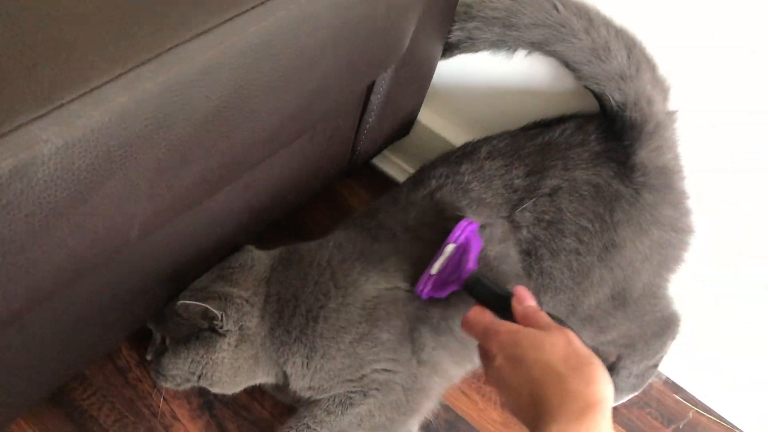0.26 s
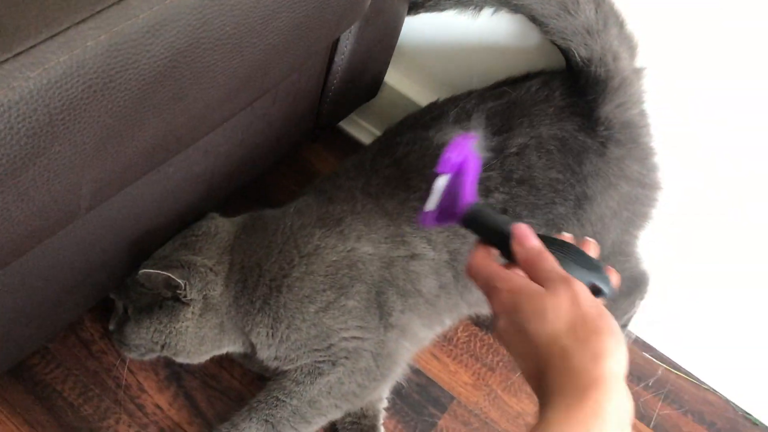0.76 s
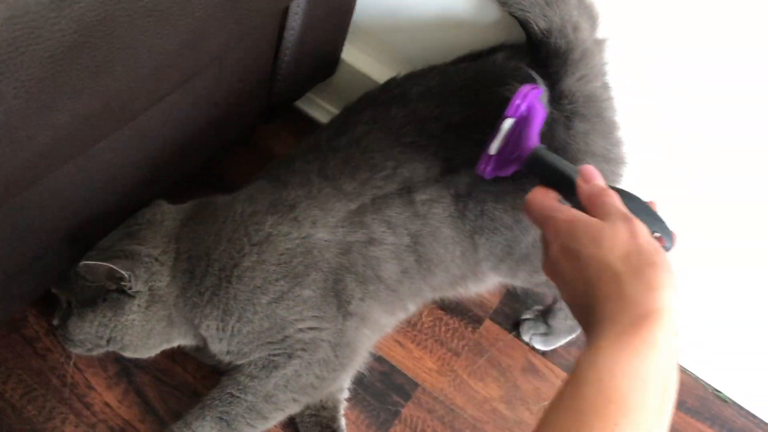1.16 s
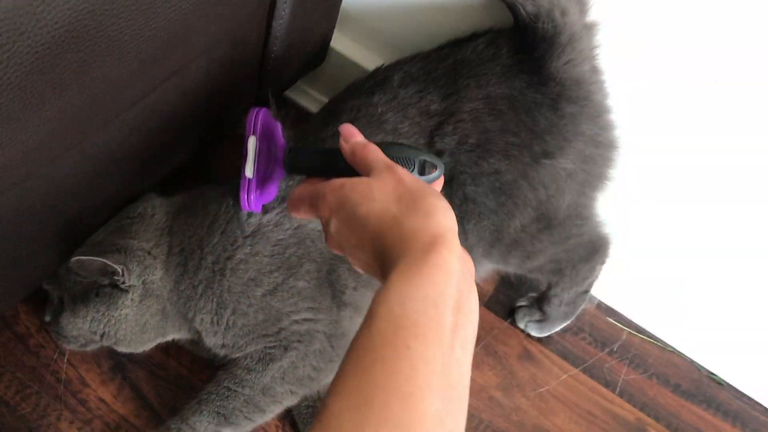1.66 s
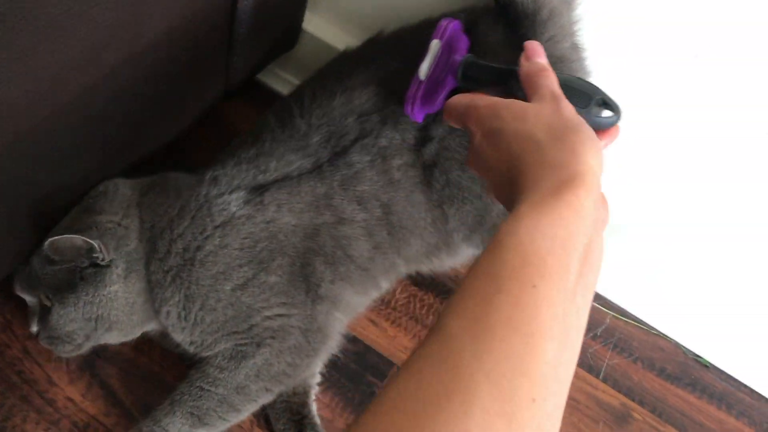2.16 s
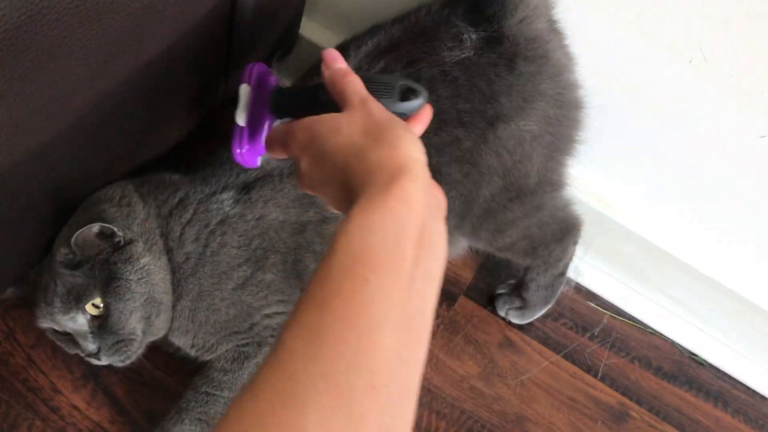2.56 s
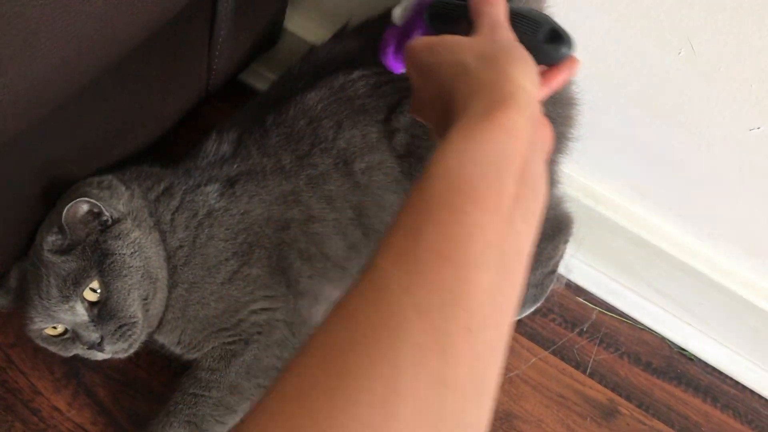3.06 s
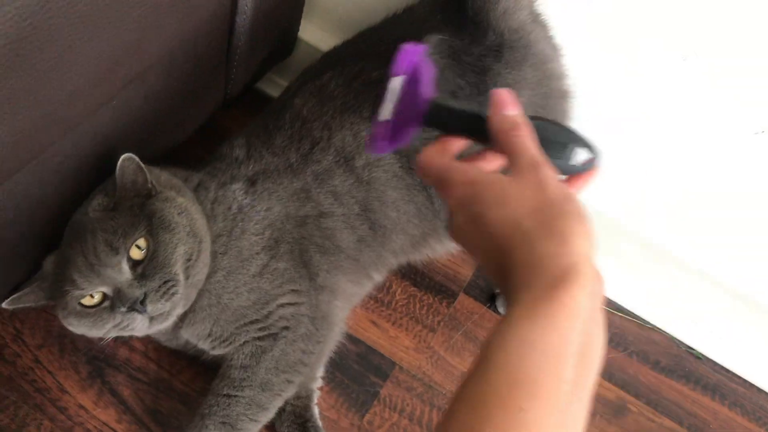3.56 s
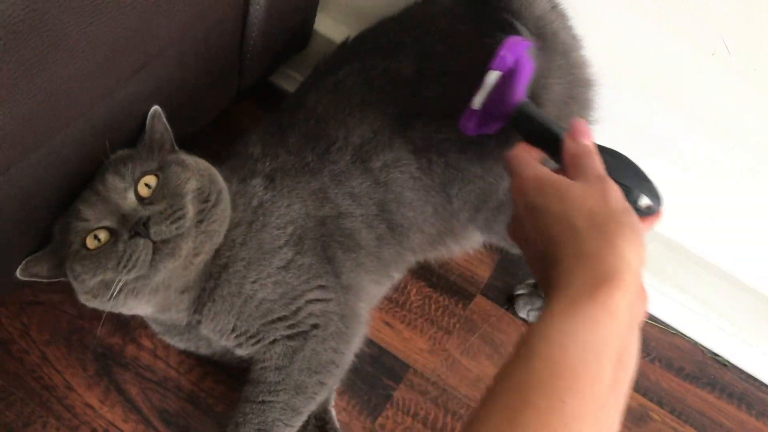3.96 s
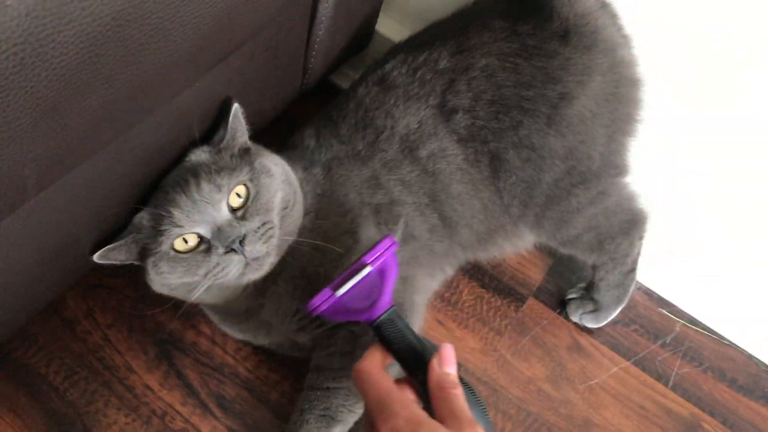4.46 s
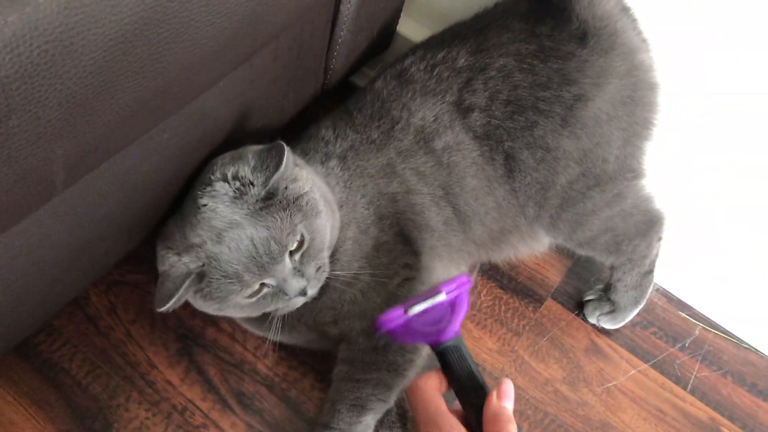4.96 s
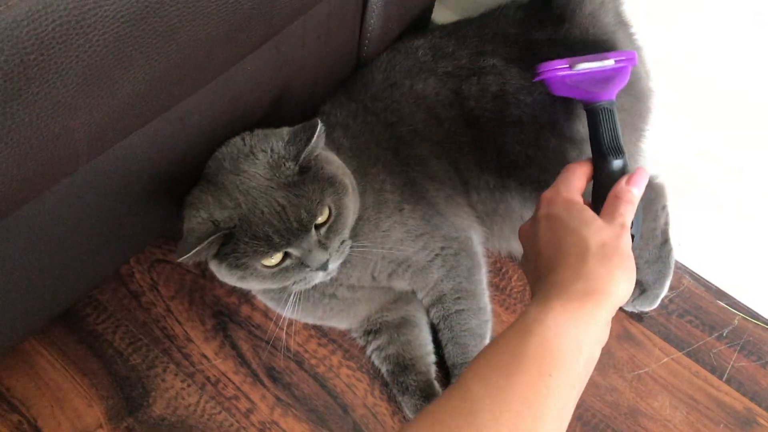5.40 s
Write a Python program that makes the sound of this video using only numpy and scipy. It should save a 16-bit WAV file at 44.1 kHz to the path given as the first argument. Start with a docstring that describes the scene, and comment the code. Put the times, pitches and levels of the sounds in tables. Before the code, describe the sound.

A steady low appliance hum and faint hiss lie under the close sound of a cat being combed. Quick scratchy pulls come singly and in pairs, then three run together near three seconds, each airy and slightly ringing. Coarser rasps catch in the thick fur. The cat purrs in low fluttering bouts through the second half, with muffled arm rustle, dull bumps and small plastic clicks before a last stroke.

```python
"""Combing a purring cat, close microphone

A steel-toothed grooming tool is raked through the coat of a softly purring cat in a quiet room.
Up close, hairs slip off the teeth with a fine hiss that sets the blade ringing; the teeth rasp where they
bite in, the plastic head ticks, and the arm rustles and bumps. The purr is a train of snaps and air puffs
ringing the chest. Behind it an appliance motor hums as a set of sine lines, over room rumble and hiss."""
import sys
import numpy as np
from scipy import signal
from scipy.fft import rfft, irfft
from scipy.io import wavfile

SR = 44100
rng = np.random.default_rng(int(sys.argv[2]) if len(sys.argv) > 2 else 0)


def bounce(signal):
    """Save signal as a 16-bit WAV file at the path given by the first command-line argument."""
    frames = np.transpose(np.atleast_2d(signal))
    limited = np.clip(frames, -1, 1)
    pcm = np.round(limited * 32767).astype(np.int16)
    wavfile.write(sys.argv[1], SR, pcm)


N = 248408
TIME = np.arange(N) / SR  # seconds

# Pulls through the coat, with a gliding lowest resonance of the comb; ring levels are relative to the pull:
# start_s, end_s, start_level_db, end_level_db, lowest_start_hz, lowest_end_hz, lowest_width_hz,
# lowest_db, second_db, third_db, highest_db
STROKES = [(0.169, 0.448, -68.5, -64.5, 3760, 3470, 550, -11.5, -11, -17, -11),
           (0.476, 0.585, -64, -64, 4380, 4110, 650, -1.5, -18, -11, -8),
           (0.958, 1.07, -72, -63.5, 3600, 3500, 600, -9.5, -9, -14, -12),
           (1.096, 1.257, -68.5, -63, 4000, 3840, 1000, -5, -18, -16, -6),
           (1.807, 2.1, -70, -63, 4230, 3970, 550, -13, -18, -11, -7),
           (2.079, 2.284, -60.5, -61.5, 4110, 3620, 500, -7.5, -10.5, -11, -6),
           (2.781, 2.957, -67.5, -63.5, 4200, 4060, 700, -18, -16, -17, -6),
           (2.943, 3.119, -62, -60.5, 3620, 3500, 250, -11, -18, -2.5, -9),
           (3.101, 3.322, -60.5, -60, 4030, 4200, 327, -6.5, -15, -7.5, -5),
           (3.849, 4.034, -63, -60, 4000, 4000, 806, -8.5, -19, -10, -8),
           (4.729, 4.795, -63, -63.5, 4120, 4100, 130, -10, -10, -11, -17),
           (4.802, 4.935, -65, -69, 4030, 4040, 110, -3, -17, -20, -10),
           (5.484, 5.66, -63, -61, 4080, 4060, 131, -7.5, -20, -10, -19)]
# The comb skims the coat between pulls: peak_s, rise_s, fall_s, level_db
SKIMS = [(0.84, .04, .05, -66.5), (2.44, 0.15, 0.11, -67), (3.48, 0.14, 0.44, -66.5), (4.1, .06, 0.13, -68),
         (5.49, .07, 0.046, -68.5)]
# Hiss of the sliding hairs: pitch_hz, density_db (per Hz)
FUR_SPECTRUM = [(600, -7.5), (1300, -2.5), (2600, -0.5), (3600, 1), (4900, -1.5), (6000, -2), (7500, -2),
                (8800, -1), (10400, -6), (12500, -2.5), (15500, -4.5)]
# Ringing of the comb: pitch_hz, width_hz, level_db
BLADE_MODES = [(3500, 430, -1), (4130, 280, -3), (8450, 300, 2), (13300, 280, 3.5), (15500, 400, -4)]
# Second, third and highest resonance of the comb under a pull: pitch_hz, width_hz
UPPER_RINGS = [(6000, 1500), (8350, 400), (13720, 440)]
ATTACK_S, RELEASE_S = 0.023, 0.017  # the teeth sink in and come free
ARCH_DB = 3.0  # the hand moves fastest in mid-stroke: this much is added there relative to the ends
RING_GROWTH_DB = 3  # gained by the resonances along a stroke, as the teeth fill with fur
CONTACT_DB = -72.5  # faint hiss of fur against the tool at all times

# Teeth biting into the undercoat: start_s, length_s, level_db
BITES = [(0.859, 0.035, -67), (1.846, 0.054, -55), (1.928, .02, -66), (2.839, 0.045, -67),
         (3.848, 0.053, -55.5), (4.865, 0.023, -64), (5.419, 0.043, -65)]
# Plastic head under the rasp: pitch_hz, width_hz, level_db
HEAD_MODES = [(820, 210, -7.5), (1237, 98, 3), (1400, 160, -0.5), (1720, 350, -2), (2180, 105, -2),
              (2700, 260, -4.5), (4480, 280, -5.5), (5660, 300, -5), (7020, 160, -7)]
# Ticks of the tool in the hand, as filtered blows: time_s, strength_db, contact_lowest_hz, contact_highest_hz
TICKS = [(4.6232, -34.5, 764, 2430), (4.890, -45, 1200, 1900), (4.943, -53, 783, 1400),
         (5.1517, -45.5, 1100, 2470), (5.3659, -38, 1490, 4530), (5.378, -47, 1580, 2200)]
# What a tick rings with: pitch_hz, level_db, t60_s
TICK_MODES = [(970, -20, 0.01), (1400, -8, 0.0072), (1926, -4, 0.0067), (2220, -6.5, 0.0087),
              (2590, -12, 0.014), (3530, -10, 0.0098), (3970, -13, .011)]

# Swings of the arm: peak_s, rise_s, fall_s, level_db
SWINGS = [(0.04, 0.049, .08, -63), (0.55, 0.1, .08, -57), (1.32, 0.44, 0.19, -59.5),
          (1.57, 0.2, .08, -55.5), (2.5, 0.031, 0.04, -57), (2.68, 0.088, .13, -56),
          (3.59, 0.14, 0.055, -60), (3.95, 0.25, 0.18, -64), (4.95, 0.45, 0.12, -62.5),
          (5.5, 0.2, 0.18, -67)]
# Dull rustle of the arm: pitch_hz, density_db (per Hz)
SLEEVE_SPECTRUM = [(120, -24.5), (220, -1), (310, 0), (470, -17.5), (620, -12), (800, -32), (1500, -25.5),
                   (1750, -15), (1950, -24.5), (2200, -23), (3000, -32), (8000, -54)]
# Soft bumps of handling: start_s, length_s, level_db, highest_hz
BUMPS = [(0.431, 0.2, -51.5, 91.5), (0.487, 0.15, -62.5, 627), (2.203, 0.075, -61, 90.5),
         (2.48, .012, -61, 500), (2.938, 0.013, -57, 447), (3.426, 0.013, -49.5, 219),
         (5.033, 0.12, -67, 200)]
ARM_REST_DB = -74.5  # rustle between swings

# Bouts of purring: start_s, end_s, pulses_per_s, level_db
PURRS = [(2.238, 3.101, 25.6, -60.5), (3.418, 3.716, 27.7, -63), (3.88, 4.64, 24.5, -58),
         (4.84, 5.24, 24, -61.5)]
# Chest and throat of the cat: pitch_hz, width_hz, level_db
CHEST_MODES = [(124.6, 18, 3), (199, 58, 0), (295, 130, -8.5)]
PURR_FADE_S, PURR_REST_DB = 0.085, -72  # fade of each bout; trace of purr between bouts

# Motor lines: multiple_of_rotation, level_db (added to the hum level)
MOTOR_LINES = [(1, -18), (2, 0), (4, -22.5), (6, -27), (8, -26), (12, -31), (13, -33.5)]
# Brief dips of the main hum line: centre_s, half_length_s, share_lost (0-1)
HUM_DIPS = [(0.612, 0.067, .85), (2.32, .04, 0.16), (4.326, 0.071, .28), (5.1, 0.03, 0.31)]
# Thin whine of the appliance: pitch_hz, level_db
WHINE = [(1239, -81), (1621, -86), (2230, -85)]
MOTOR_HZ = 49.115  # rotations per second
HUM_DB, HUM_SWAY_DB = -48.5, 0.62  # motor hum and the spread of its slow sway

# Room rumble and air: pitch_hz, density_db (per Hz)
ROOM_SPECTRUM = [(20, -37), (35, -13.5), (50, 3), (70, -2), (110, -5), (200, -9), (320, -14), (480, -17.5),
                 (650, -20), (820, -20.5), (1400, -23), (2500, -27.5), (4000, -32), (9000, -54)]
# Steady microphone hiss: pitch_hz, density_db (per Hz)
HISS_SPECTRUM = [(1500, -11), (3000, 2), (4400, 3.5), (4950, -0.5), (5500, 4), (6900, 2.5), (7600, -2.5),
                 (8600, 5), (9600, 1), (10400, -5), (11800, 5), (13000, -1), (15600, 0)]
CUTOFF_HZ = 15800  # top of the sound that is kept


def combing(hiss_db=-0.5, ring_db=-12.5, wander=.008, flutter_db=1.06, ring_flutter_db=4.0, patchy_db=2.0):
    """Thousands of hairs slip off the teeth each second and excite the comb."""
    power = gestures(SKIMS, CONTACT_DB) ** 2
    for start, end, start_db, end_db, *_ in STROKES:
        power = power + pull(start, end, start_db, end_db) ** 2
    drag = np.sqrt(power) * from_db(flutter_db * drift(rate=17.0))
    # the coat is uneven, so the colour of the hiss shifts along a stroke
    hiss = patchy(colour(slips(per_s=14000, spread_db=3.0), FUR_SPECTRUM), patchy_db)
    # the load of fur on the teeth keeps shifting their pitch a little
    bend = 1 + wander * drift(rate=5.0)
    ring = 0
    for hz, width, db in BLADE_MODES:
        flutter = ring_flutter_db * drift(rate=8.2)
        ring = ring + shaken_tone(hz * bend, width) * from_db(db + flutter)
    return drag * (from_db(hiss_db) * hiss + from_db(ring_db) * rms_one(ring))


def singing(wander=.006, tail_s=.08, flutter_db=0.7):
    """Under a firm pull the comb's resonances stand out, following the drag and growing along the stroke."""
    out = np.zeros(N)
    bend = 1 + wander * drift(rate=6.5)
    catches = [flutter_db * drift(rate=12.0) for _ in range(len(UPPER_RINGS) + 1)]
    for start, end, start_db, end_db, start_hz, end_hz, low_width, *rings_db in STROKES:
        span = (TIME >= start) & (TIME <= end + tail_s)
        along = np.clip((TIME[span] - start) / (end - start), 0, 1)
        growth = from_db(RING_GROWTH_DB * (along - .5))
        drive = pull(start, end, start_db, end_db)[span] * growth
        lowest = (start_hz + (end_hz - start_hz) * along, low_width)
        for (hz, width), db, catch_db in zip([lowest, *UPPER_RINGS], rings_db, catches):
            tone = shaken_tone(hz * bend[span], width)
            out[span] += from_db(db + catch_db[span]) * drive * tone
    return out


def pull(start, end, start_db, end_db):
    """Gain of one stroke: teeth sink in, drag changes as fur gathers, hand speeds up and slows, teeth free."""
    along = np.clip((TIME - start) / (end - start), 0, 1)
    arch = np.sin(np.pi * along) - 2 / np.pi  # averages zero over the stroke
    level_db = start_db + (end_db - start_db) * along + ARCH_DB * arch
    return from_db(level_db) * swell(start, end - start, ATTACK_S, RELEASE_S)


def biting(grit_db=1.5):
    """Coarser stick-slip in the dense undercoat shakes the plastic head, tuft by tuft."""
    force = sum(from_db(db) * swell(s, length, rise=0.014, fall=0.02) for s, length, db in BITES)
    tufts = from_db(grit_db * drift(rate=87.0))
    return force * body(tufts * slips(per_s=2500, spread_db=-1.0), HEAD_MODES)


def ticks(tail_db=-28.0, tail_t60=0.09):
    """Single contacts ring the plastic briefly; the room adds a faint tail."""
    blows = np.zeros(N)
    for s, db, low_hz, high_hz in TICKS:
        impulse = from_db(db) * (np.arange(N) == round(s * SR))
        low_cut = signal.butter(3, low_hz, "high", fs=SR, output="sos")
        blows += signal.sosfilt(low_cut, low_pass(impulse, high_hz))
    out = 0
    for hz, db, t60 in TICK_MODES:
        r = from_db(-60 / (t60 * SR))  # decay per sample
        w = 2 * np.pi * hz / SR
        rung = signal.lfilter([0, np.sin(w)], [1, -2 * r * np.cos(w), r * r], blows)
        out = out + from_db(db) * rung
    tail = white() * np.exp(-np.log(1000) * TIME / tail_t60)
    return out + from_db(tail_db) * signal.fftconvolve(out, tail / 2)[:N]


def handling():
    """The arm rustles as it moves, and the hand bumps softly."""
    flutter = from_db(2.0 * drift(rate=15.0))
    out = gestures(SWINGS, ARM_REST_DB) * flutter * colour(white(), SLEEVE_SPECTRUM)
    for s, length, db, top_hz in BUMPS:
        dull = [(top_hz / 2, 0), (top_hz, -2), (2 * top_hz, -24), (10 * top_hz, -70)]
        thud = colour(white(), dull)
        out += from_db(db) * swell(s, length, rise=0.018, fall=0.013) * thud
    return out


def purring(jitter=0.00753, open_share=0.17, air_db=-5.0):
    """The larynx snaps open once a cycle; each snap and its puff of air ring the chest."""
    starts, ends, rates, _ = np.transpose(PURRS)
    per_s = np.interp(TIME, (starts + ends) / 2, rates)
    effort = from_db(PURR_REST_DB)
    for start, end, _, db in PURRS:
        fade = np.clip(np.minimum(TIME - start, end - TIME) / PURR_FADE_S, 0, 1)
        effort = np.maximum(effort, from_db(db) * fade)
    cycles = np.cumsum(per_s * (1 + jitter * drift(rate=6.2))) / SR
    snaps = rms_one(np.diff(np.floor(cycles), prepend=0))
    # the air dies away within each cycle
    puffs = rms_one(white() * np.exp(-(cycles % 1) / open_share))
    voice = low_pass(body(snaps + from_db(air_db) * puffs, CHEST_MODES), hz=432)
    return effort * rms_one(voice)


def appliance(waver_db=1.0, phase_wobble=0.068):
    """A motor hums at twice its rotation rate; that main line dips now and then, the weaker lines waver."""
    level_db = HUM_DB + HUM_SWAY_DB * drift(rate=1.4)
    dips = 1 - sum(share * np.exp(-((TIME - s) / half) ** 2) for s, half, share in HUM_DIPS)
    turn = 2 * np.pi * MOTOR_HZ * TIME + phase_wobble * drift(rate=0.86)
    out = 0
    for order, db in MOTOR_LINES:
        order = round(order)
        waver = dips if order == 2 else from_db(waver_db * drift(rate=4.1))
        line = np.sin(order * turn + rng.uniform(0, 2 * np.pi))
        out = out + from_db(level_db + db) * waver * line
    for hz, db in WHINE:
        line = np.sin(2 * np.pi * hz * TIME + drift(rate=11.0))
        out = out + from_db(db + waver_db * drift(rate=5.9)) * line
    return np.sqrt(2) * out  # a sine of this amplitude has rms 1


def background(room_db=-60.0, hiss_db=-69.5):
    """Low room noise under an even microphone hiss, both coloured white noise."""
    room = from_db(room_db) * colour(white(), ROOM_SPECTRUM)
    return room + from_db(hiss_db) * colour(white(), HISS_SPECTRUM)


def from_db(db):
    """Decibels to gain."""
    return 10 ** (np.asarray(db) / 20)


def rms_one(x):
    """Scale to unit power."""
    return x / np.sqrt(np.mean(x ** 2) + 1e-20)


def white():
    """Fresh white noise."""
    return rng.standard_normal(N)


def colour(x, spectrum):
    """Give x a spectrum of (Hz, dB) points, falling away below the first; rms 1."""
    hz, db = np.transpose(spectrum)
    bins = np.maximum(np.arange(N // 2 + 1) * SR / N, 1)
    slope = np.interp(np.log(bins), np.log(hz), db)
    low_fall = np.minimum(bins / hz[0], 1) ** 2
    return rms_one(irfft(rfft(x) * from_db(slope) * low_fall, N))


def drift(rate, count=4096):
    """Slow random curve of rms 1, changing about rate times a second."""
    bins = np.arange(count // 2 + 1) * SR / N
    slow = irfft(rfft(rng.standard_normal(count)) / (1 + (bins / rate) ** 2), count)
    return rms_one(np.interp(np.arange(N), np.linspace(0, N, count), slow))


def low_pass(x, hz):
    """Second-order low-pass."""
    return signal.sosfilt(signal.butter(2, min(hz, SR / 3), fs=SR, output="sos"), x + 1e-18)


def body(x, resonances):
    """Parallel resonances of (Hz, width Hz, dB), signs alternating; rms 1."""
    out = 0
    for k, (hz, width, db) in enumerate(resonances):
        r = np.exp(-np.pi * width / SR)
        rung = signal.lfilter([1, 0, -1], [1, -2 * r * np.cos(2 * np.pi * hz / SR), r * r], x + 1e-18)
        out = out + (-1) ** k * from_db(db) * rms_one(rung)
    return rms_one(out)


def shaken_tone(hz, width):
    """A resonance of gliding pitch hz, driven by random friction; rms 1."""
    noise = rng.standard_normal((2, len(hz)))
    shaken = low_pass(noise[0] + 1j * noise[1], width / 2)
    return rms_one(np.real(shaken * np.exp(2j * np.pi * np.cumsum(hz) / SR)))


def slips(per_s, spread_db):
    """Random tiny clicks of uneven size and either sign; rms 1."""
    born = rng.random(N) < per_s / SR
    size = from_db(spread_db * np.clip(white(), -2, 2))
    return rms_one(born * np.sign(white()) * size)


def patchy(x, depth_db, count=7):
    """Each band of x swells and fades on its own; rms 1."""
    edges = np.geomspace(1500, 16000, count)  # Hz
    bands = np.searchsorted(edges, np.arange(N // 2 + 1) * SR / N)
    spectrum = rfft(x)
    out = 0
    for k in range(count + 1):
        out = out + irfft(spectrum * (bands == k), N) * from_db(depth_db * drift(rate=7.3))
    return rms_one(out)


def swell(start, length, rise, fall):
    """A quick rise, a hold and an exponential fall."""
    decay = np.exp(-np.maximum(TIME - start - length, 0) / fall)
    return np.clip((TIME - start) / rise, 0, 1) * decay


def gestures(rows, rest_db):
    """Gain of smooth movements that swell to a peak and die away, over a resting level."""
    power = from_db(rest_db) ** 2
    for s, rise, fall, db in rows:
        bell = np.exp(-((TIME - s) / np.where(TIME < s, rise, fall)) ** 2)
        power = power + (from_db(db) * bell) ** 2
    return np.sqrt(power)


def scene():
    """Everything reaches one close microphone, heard alike on both channels."""
    tool = combing() + singing() + biting() + ticks()
    mono = tool + handling() + purring() + appliance() + background()
    return np.stack([mono, mono])


def record(dry):
    """The level dips once, very briefly; the top is cut."""
    dip_s, half_s = 2.298, 0.007
    dip = 1 - from_db(-1.5) * np.exp(-((TIME - dip_s) / half_s) ** 2)
    top_cut = signal.ellip(12, .1, 80, CUTOFF_HZ, fs=SR, output="sos")
    return signal.sosfilt(top_cut, dry * dip)


dry = scene()
out = record(dry)
bounce(out)
```